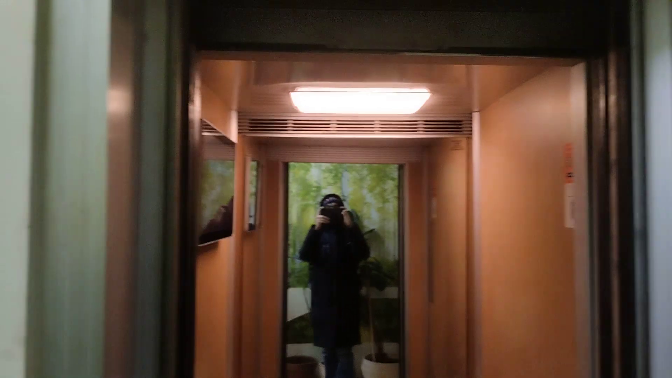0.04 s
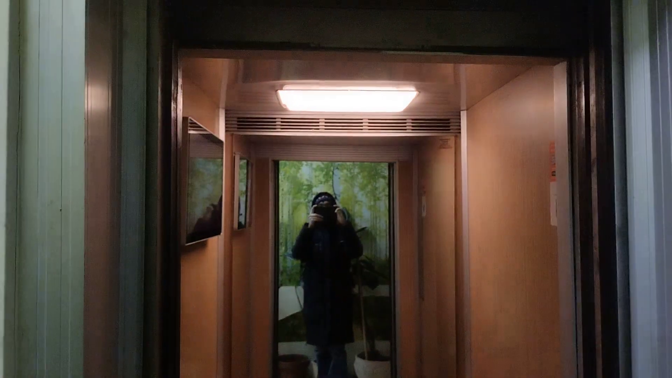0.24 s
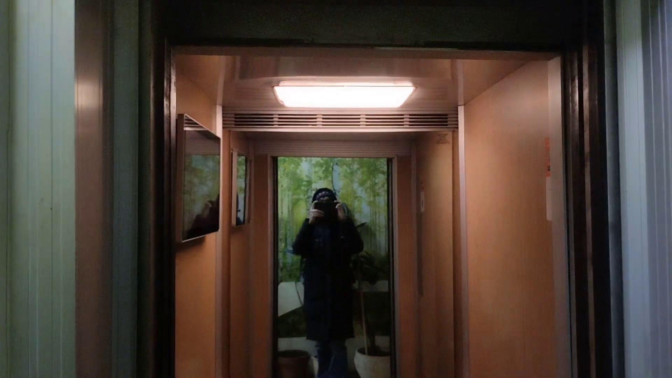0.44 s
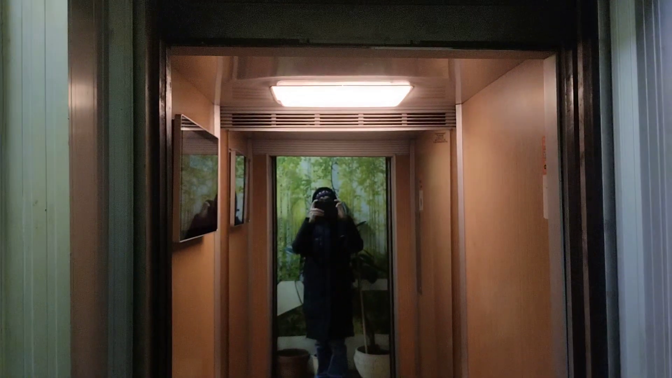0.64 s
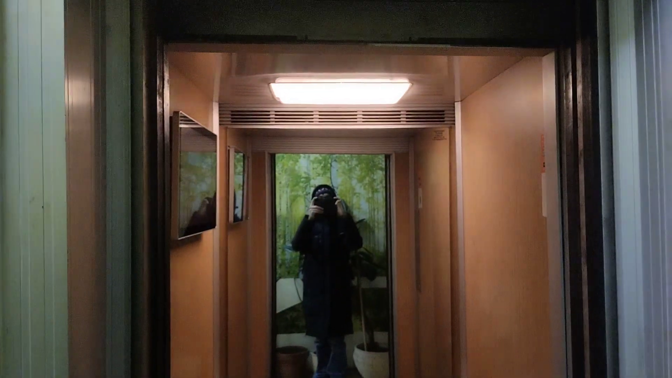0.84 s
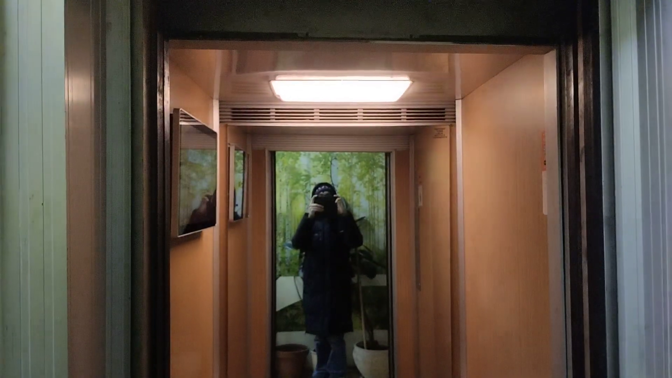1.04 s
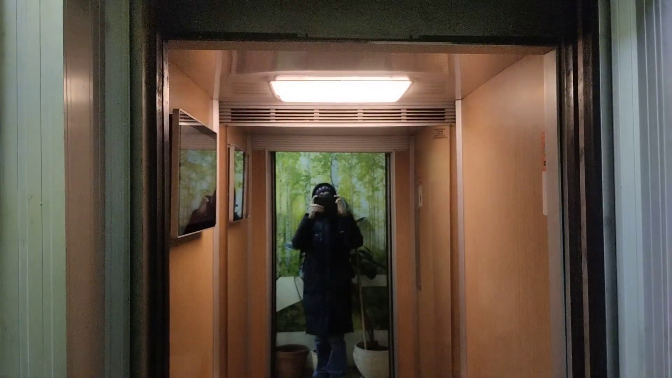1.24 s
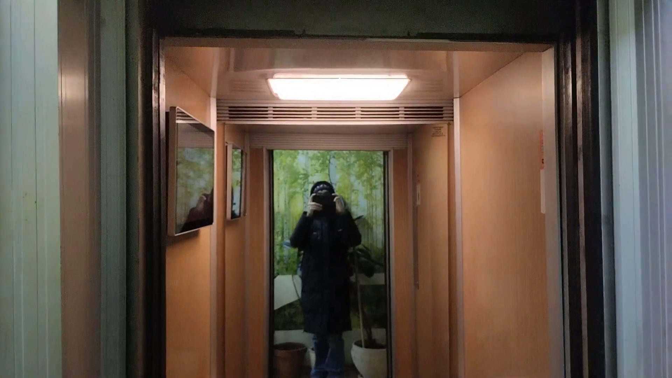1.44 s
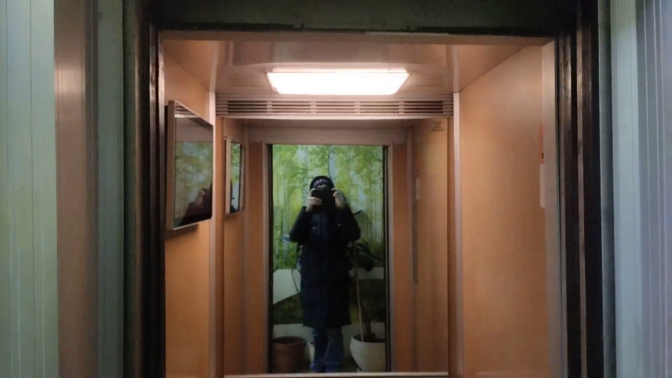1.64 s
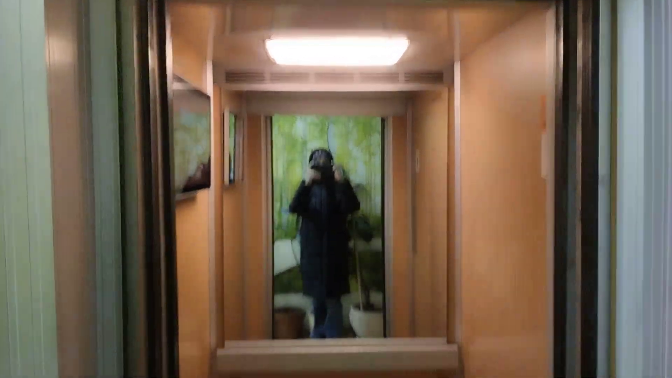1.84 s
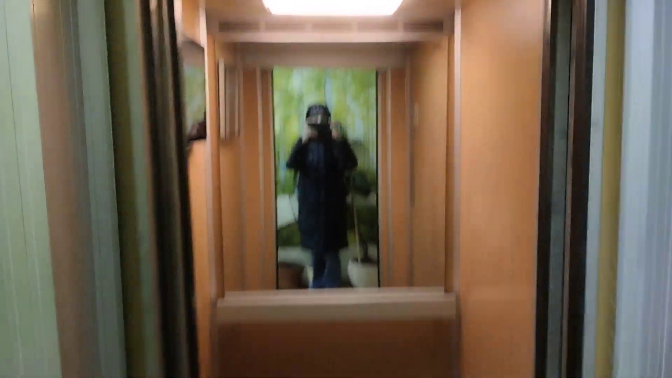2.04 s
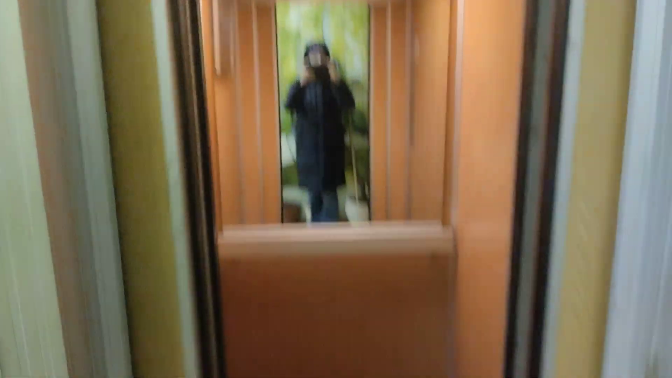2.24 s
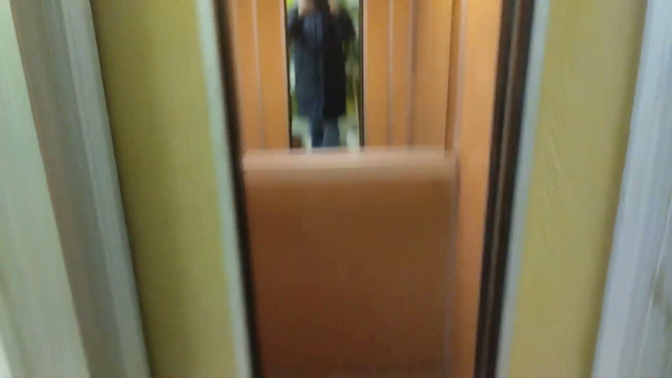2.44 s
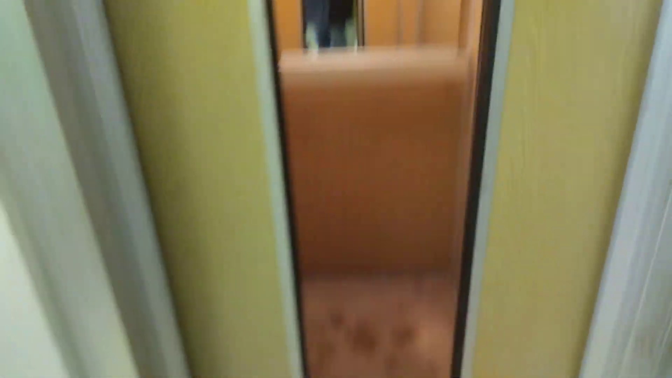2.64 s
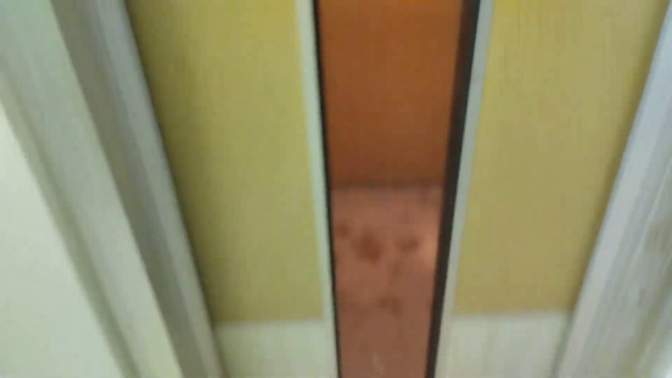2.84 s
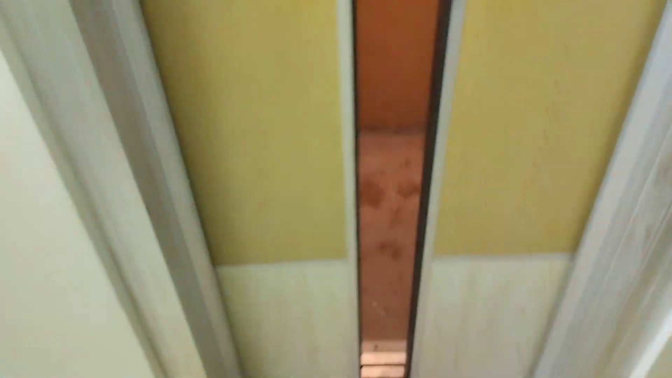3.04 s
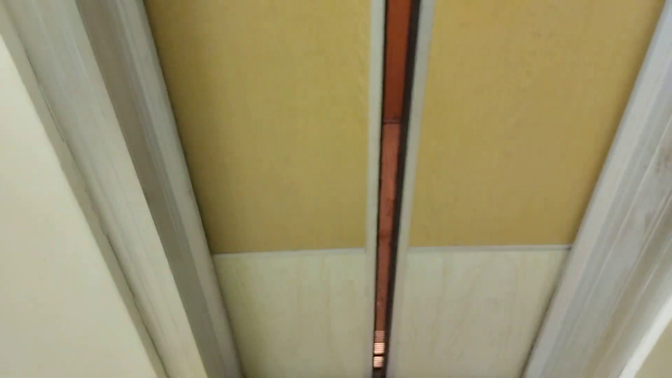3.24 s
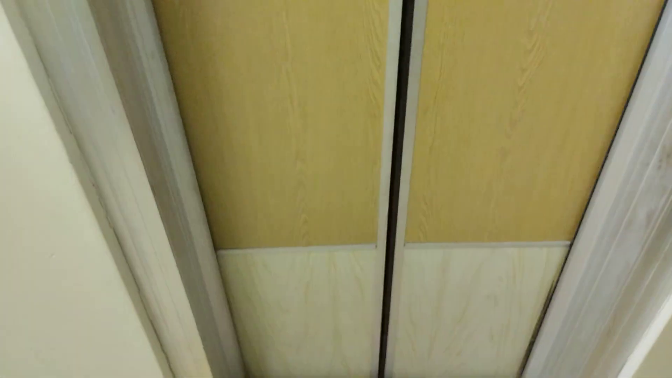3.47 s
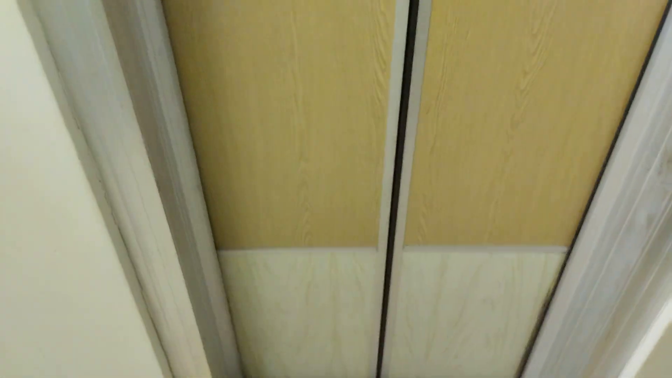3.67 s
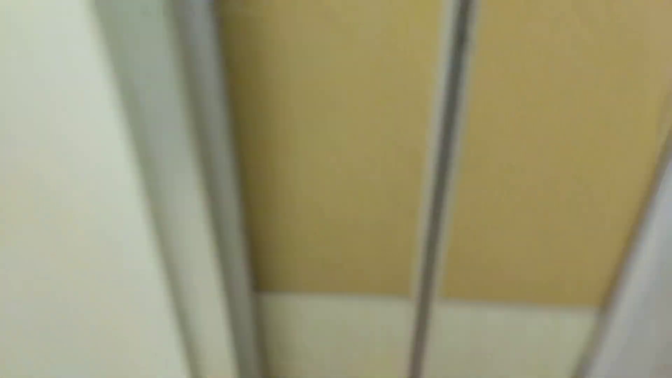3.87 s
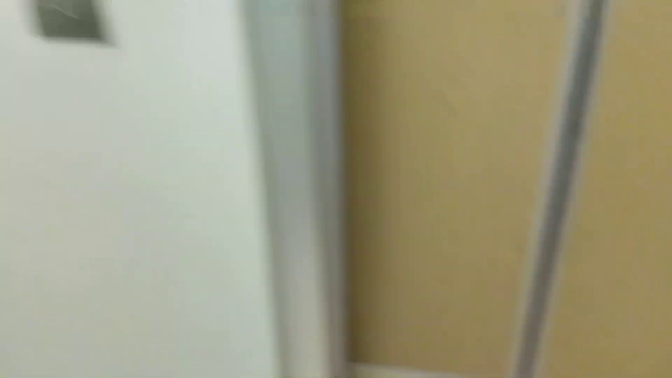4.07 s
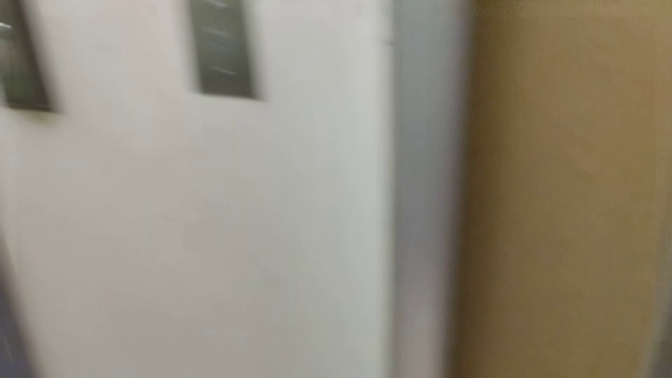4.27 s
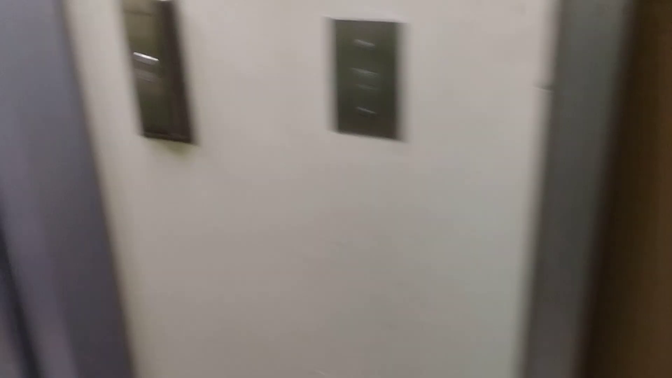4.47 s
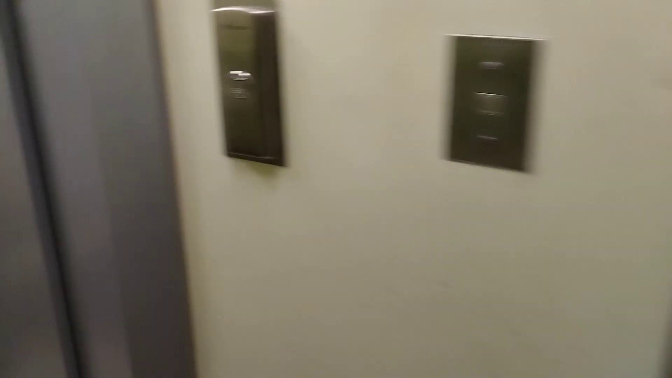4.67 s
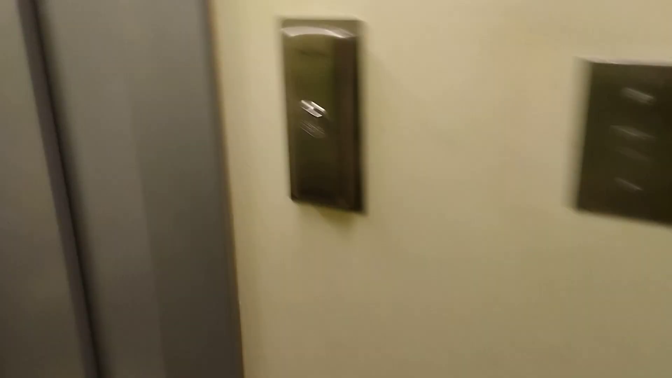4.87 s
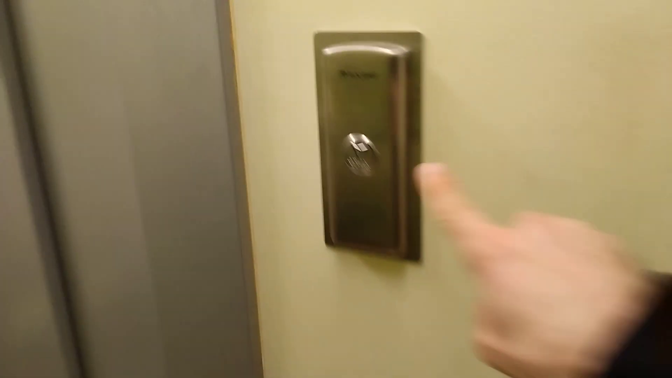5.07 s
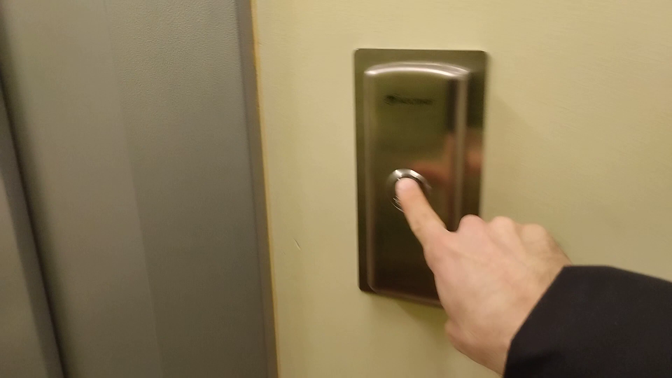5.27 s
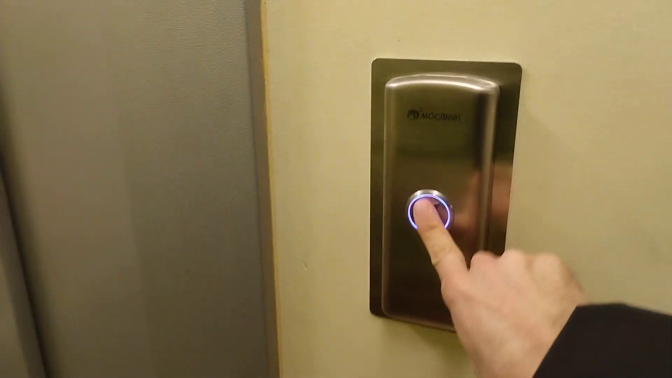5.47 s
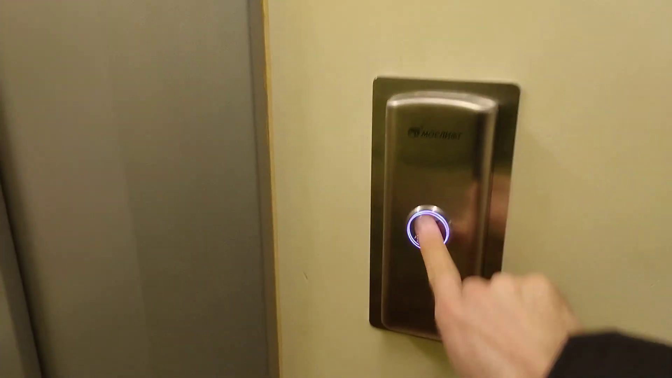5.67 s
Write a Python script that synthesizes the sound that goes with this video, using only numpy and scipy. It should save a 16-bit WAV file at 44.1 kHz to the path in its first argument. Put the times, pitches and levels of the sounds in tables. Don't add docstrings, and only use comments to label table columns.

```python
import sys
import numpy as np
from scipy import signal
from scipy.fft import rfft, irfft, next_fast_len
from scipy.io import wavfile
from scipy.ndimage import uniform_filter1d

SR = 44100
rng = np.random.default_rng(int(sys.argv[2]) if len(sys.argv) > 2 else 0)


def decibels_to_gain(level_db):
    exponent = np.asarray(level_db, float) / 20
    return 10 ** exponent


def transcribe(signal):
    frames = np.atleast_2d(signal).T
    limited = np.clip(frames, -1, 1)
    pcm = np.round(limited * 32767).astype(np.int16)
    wavfile.write(sys.argv[1], SR, pcm)


N = 251811


def unit(x):
    return x / np.sqrt(np.mean(x ** 2))


def peak(x, db):
    return x * decibels_to_gain(db) / np.abs(x).max()


def seconds(count):
    return np.arange(count) / SR


def noise(count):
    return rng.standard_normal(count)


def add(out, start_s, x):
    i = int(start_s * SR)
    out[i:i + len(x)] += x[:len(out) - i]


def colour(x, spectrum):
    hz, db = np.transpose(spectrum)
    size = next_fast_len(len(x))
    bins_hz = np.maximum(np.arange(size // 2 + 1) * SR / size, 1)
    gain = decibels_to_gain(np.interp(np.log(bins_hz), np.log(hz), db))
    return unit(irfft(rfft(x, size) * gain, size)[:len(x)])


def band(x, hz, width_hz):
    return signal.lfilter(*signal.iirpeak(min(hz, .45 * SR), hz / width_hz, fs=SR), x)


def two_bands(x, hz, width_hz, hz2, width2_hz):
    return band(band(x, hz, width_hz), hz2, width2_hz)


def dull(x, cutoff_hz):
    return signal.sosfilt(signal.butter(2, cutoff_hz, fs=SR, output="sos"), x)


def curves(table):
    s, *columns = np.transpose(table)
    t = seconds(N)
    runs_to_end = s[-1] > 5.6
    gate = np.clip(np.minimum(t - s[0] + .006, s[-1] - t + runs_to_end) / .006, 0, 1)
    return gate, [np.interp(t, s, column) for column in columns]


def walk(rate):
    hold = int(SR / rate)
    steps = np.repeat(noise(N // 50), hold)[:N]
    return 1.3 * uniform_filter1d(uniform_filter1d(steps, hold), hold)


def grit(spread_db, flicker_db, rate):
    size = np.minimum(rng.exponential(size=N), 5)
    return noise(N) * decibels_to_gain(spread_db * size + flicker_db * walk(rate))


def ring(push, modes):
    t = seconds(len(push))
    body = 0
    for hz, db, t60 in modes:
        body = body + decibels_to_gain(db) * np.sin(2 * np.pi * hz * t) * np.exp(-np.log(1000) / max(t60, .003) * t)
    return signal.fftconvolve(push, body)[:len(push)]


# pitch_hz, level_db [dB per Hz]
HUSH = [(150, -34), (250, -7.5), (407, -3.5), (1330, -13), (2860, -18), (5070, -21.5), (6360, -18.5),
        (10200, -20), (15200, -25.5), (16000, -26)]
# pitch_hz, level_db [dB per Hz]
SHAFT = [(18, -45), (30, -16), (72, 0), (88, -4), (103, -17.5), (193, -11), (223, -22.5), (300, -22),
         (390, -53), (660, -120)]
# time_s, level_db
SHAFT_LOAD = [
    (0, -61),
    (.97, -60.5),
    (1.03, -62.5),
    (1.35, -61),
    (4.55, -60),
    (4.7, -61.5),
    (5.71, -68),
]


def air():
    hush = colour(noise(N), HUSH)
    hum = colour(noise(N), SHAFT)
    drift = colour(noise(N), [(5, -39), (10, 4.5), (22, 0), (40, -28), (80, -67.5)])
    _, (hum_db,) = curves(SHAFT_LOAD)
    return decibels_to_gain(-71.5) * hush + decibels_to_gain(hum_db) * hum + decibels_to_gain(-62) * drift


# middle_s, level_db, width_s, direction (1 or -1)
JOLT = [
    (4.746, -34, .008, -1),
    (4.763, -30.5, .007, 1),
    (4.779, -42, .006, -1),
]


def jolt():
    t = seconds(N)
    return sum(way * decibels_to_gain(db) * np.exp(-((t - s) / width) ** 2) for s, db, width, way in JOLT)


# pitch_hz, level_db [dB per Hz]
SWISH = [(3240, -35), (5500, -15), (8150, 3.5), (9320, 2.5), (12500, -8), (15200, -7), (16000, -13.5)]
SCUFF = [(1060, -20.5), (1800, 0.5), (2000, -2), (2130, -0.5), (3260, -4.5), (6000, -8), (7800, -21),
         (13200, -120)]
RUB = [(88, -0.5), (150, -1.5), (287, -0.5), (557, -0.5), (1130, -5), (1460, -7), (2000, -23), (2600, -60),
       (4400, -120)]
# fastest_s, swish_db, scuff_db, low_rub_db, half_length_s
CLOTH = [
    (0.06, -71.5, -70, -75.5, 0.27),
    (4.14, -59, -63, -71, 0.13),
    (4.462, -63.5, -65, -65.5, 0.23),
    (4.665, -56.5, -66, -60, 0.11),
    (4.773, -57, -58.5, -58.5, 0.046),
    (4.916, -50.5, -59, -59.5, 0.087),
    (5.068, -47.5, -53.5, -50.5, 0.14),
    (5.379, -61.5, -69.5, -62, 0.1),
    (5.53, -65.5, -79, -78, 0.1),
    (5.71, -61.5, -66, -58, 0.11),
]


def cloth():
    fibres = grit(1.2, .7, 45)
    swish, scuff, rub = (colour(fibres, shape) for shape in (SWISH, SCUFF, RUB))
    out, t = np.zeros(N), seconds(N)
    for s, swish_db, scuff_db, rub_db, half in CLOTH:
        mix = decibels_to_gain(swish_db) * swish + decibels_to_gain(scuff_db) * scuff + decibels_to_gain(rub_db) * rub
        out += np.exp(-((t - s) / half) ** 2) * mix
    return out


# snap_s, peak_db, treble_db, body_hz, slide_db, slide_s
BUTTON = [
    (5.3114, -33, 3, 1260, -5.5, .007),
    (5.649, -32.5, -5.5, 1220, -10, .019),
]
# pitch_hz, level_db, t60_s
BUTTON_MODES = [
    [(410, -6, 0.042), (1180, -9, 0.024), (2030, -4, 0.0094), (2830, -3.5, 0.0076), (5170, -6.5, 0.0095),
     (7450, -3, 0.018), (9000, -4, .01)],
    [(700, -9, 0.007), (1310, -2, 0.029), (2040, -4.5, 0.0098), (2560, -3, .012), (3070, -8, 0.012),
     (8460, -10, .008), (9450, -8, .008)],
]


def button():
    out, t = np.zeros(N), seconds(SR // 4)
    for (s, db, treble_db, body_hz, slide_db, slide_s), modes in zip(BUTTON, BUTTON_MODES):
        chatter = np.exp(-(t / .005) ** 4) * np.minimum(.3 + t / .003, 1) + .2 * np.exp(-t / .008)
        snap = noise(len(t)) * chatter
        slide = two_bands(noise(len(t)), body_hz, 560, body_hz, 820)
        slide = slide * np.minimum(t / .003, 1) * np.exp(-(t / slide_s) ** 6)
        add(out, s - slide_s, peak(slide, db + slide_db))
        treble = two_bands(snap, 9200, 7000, 9600, 6100)
        add(out, s, peak(ring(snap, modes), db + 3.5) + peak(treble, db + treble_db))
    return signal.sosfilt(signal.butter(2, (230, 13000), "band", fs=SR, output="sos"), out)


# start_s, peak_db, pitch_hz, length_s
FLECKS = [(1.2386, -62, 12000, .001), (1.3363, -54, 9300, .006), (1.393, -46, 10200, .004),
          (1.407, -50, 12500, .003), (1.43, -54, 11000, .002), (1.446, -51, 9500, .002),
          (1.462, -50, 9300, .002), (1.47, -56, 11000, .002), (1.49, -59, 11500, .002),
          (1.5124, -59, 10500, .002), (1.6681, -50, 9300, .006), (1.6805, -48, 10000, .004),
          (1.69, -42, 10500, .008), (1.724, -39, 10000, .003), (3.356, -32, 13500, .01),
          (3.353, -21, 5500, .001), (2.637, -36, 9000, .001), (3.078, -48, 11500, .01),
          (4.519, -42, 13600, .0005), (4.552, -34.5, 8700, .0008)]


def flecks():
    out, t = np.zeros(N), seconds(SR // 20)
    for s, db, hz, length in FLECKS:
        grain = noise(len(t)) * np.exp(-t / length)
        add(out, s, peak(two_bands(grain, hz, 2500, hz, 4000), db))
    return out


# start_s, peak_db
CRACKS = [
    (1.8482, -28),
    (3.3539, -14),
    (4.519, -42),
]


def cracks():
    out, t = np.zeros(N), seconds(SR // 50)
    for s, db in CRACKS:
        snap = noise(len(t)) * np.exp(-t / .0004)
        add(out, s, peak(two_bands(snap, 8000, 10000, 8000, 4500), db))
    return out


# start_s, peak_db, ring_hz, t60_s
TICKS = [(1.2386, -63, 8450, .072), (1.6876, -35.5, 9000, .087), (1.759, -38, 6100, .073),
         (1.848, -38, 8150, 0.2), (1.949, -50, 6050, .029), (1.975, -34, 6300, .06),
         (2.1988, -35.5, 7860, 0.16), (2.2614, -37.5, 8850, 0.2), (2.297, -39.5, 8100, .074),
         (2.3545, -40, 9100, .04), (2.636, -32.5, 8300, 0.03), (2.9337, -41, 6100, 0.089),
         (3.0923, -29, 8350, 0.086), (3.1446, -36, 8500, 0.078), (3.354, -18.5, 9000, 0.062),
         (3.527, -22, 7700, 0.083), (3.8, -39, 8130, .02), (3.8073, -37, 7900, 0.027),
         (3.825, -38.5, 5500, .02), (2.55, -29.5, 8000, 0.055), (4.462, -52, 8650, 0.068),
         (4.552, -49, 8550, 0.03)]


def ticks():
    out, t = np.zeros(N), seconds(SR // 6)
    for s, db, ring_hz, t60 in TICKS:
        edge = noise(len(t)) * np.exp(-t / .0006)
        edge = two_bands(edge, 8300, 9000, 8300, 9000)
        tail = noise(len(t)) * 1000 ** (-t / np.clip(t60, .005, .3)) * np.minimum(t / .0021, 1)
        thin = band(tail, ring_hz, 600)
        wide = two_bands(tail, 6100, 6000, 8600, 7000)
        add(out, s, peak(edge, db - 3.5) + peak(thin, db - 3) + peak(wide, db - 5.5))
    return out


# time_s, pitch_hz, level_db
SQUEAK = [
    (3.025, 7250, -43),
    (3.05, 6970, -35),
    (3.075, 7030, -43),
    (3.1, 7070, -50),
]


def squeak():
    gate, (hz, db) = curves(SQUEAK)
    phase = 2 * np.pi * np.cumsum(hz * (1 + .0154 * walk(700))) / SR
    rough = unit(two_bands(noise(N), 9100, 900, 7840, 1300))
    tone = np.sin(phase) + decibels_to_gain(-24) * np.sin(2 * phase) + decibels_to_gain(-14) * rough
    return gate * decibels_to_gain(db - 3 + 3.5 * walk(300)) * tone


# start_s, end_s, level_db, from_hz, to_hz
CHIRPS = [
    (1.722, 1.785, -43.5, 1400, 1600),
    (3.028, 3.055, -59, 13600, 13900),
    (3.042, 3.062, -63, 14500, 15100),
    (3.045, 3.085, -50.5, 8100, 8700),
    (3.03, 3.06, -53, 7600, 8100),
    (3.098, 3.115, -60, 11900, 12000),
    (3.06, 3.09, -67, 14000, 14000),
]


def chirps():
    out = np.zeros(N)
    for start, end, db, from_hz, to_hz in CHIRPS:
        t = np.linspace(0, 1, int((end - start) * SR))
        wander = uniform_filter1d(noise(SR // 5), size=40)
        grip = decibels_to_gain(5 * unit(wander[::-1][:len(t)]))
        hz = (from_hz + (to_hz - from_hz) * t) * (1 + .33 * wander[:len(t)])
        swell = np.sqrt(2 * np.sin(np.pi * t))
        add(out, start, decibels_to_gain(db) * grip * swell * np.sin(2 * np.pi * np.cumsum(hz) / SR))
    return out


# start_s, end_s, level_db, pitch_hz, width_hz
RUBBING = [(1.343, 1.9, -62.5, 3360, 140), (1.345, 1.6, -63, 2230, 160), (1.5, 1.59, -57.5, 1590, 140),
           (1.6, 1.651, -59, 1570, 120), (1.505, 1.579, -58.5, 1860, 130), (1.737, 1.899, -52, 1836, 110),
           (3.097, 3.182, -50.5, 2530, 95), (3.093, 3.19, -61, 3500, 90), (3.095, 3.19, -54, 5500, 90),
           (3.1, 3.19, -61, 8300, 80), (3.075, 3.096, -56, 12000, 1500), (3.14, 3.17, -51, 9100, 1200),
           (3.34, 3.355, -44, 6700, 4000), (3.403, 3.42, -31, 6800, 900), (3.418, 3.45, -34.5, 8000, 2000),
           (3.41, 3.459, -33, 2660, 230), (3.511, 3.535, -28.5, 8800, 1400),
           (3.519, 3.536, -28, 5200, 2100), (3.55, 3.72, -59, 4030, 110), (3.53, 3.665, -43, 2200, 140),
           (3.7, 3.76, -49.5, 9000, 830), (5.657, 5.71, -59, 1560, 500)]


def rubbing():
    out = np.zeros(N)
    for start, end, db, hz, width_hz in RUBBING:
        t = seconds(int((end - start) * SR))
        touch = np.clip(np.minimum(t / .0074, (t[-1] - t) / .0098), 0, 1)
        song = two_bands(noise(SR * 2 // 3), hz, width_hz, hz, 2 * width_hz)
        steady = unit(song / np.sqrt(uniform_filter1d(song ** 2, size=SR // 30)))
        add(out, start, decibels_to_gain(db) * touch * steady[-len(t):])
    return out


# start_s, peak_db, pitch_hz
BUMPS = [(1.401, -38.5, 190), (1.457, -41.5, 110), (1.49, -41, 150), (1.567, -38.5, 140), (1.659, -33, 120),
         (2.001, -36, 216), (2.347, -32, 221), (2.396, -32, 223), (2.427, -35, 228), (2.495, -36.5, 249),
         (2.5, -35, 520), (2.59, -35.5, 540), (2.519, -30.5, 216), (2.56, -33, 232), (2.62, -30.5, 189),
         (2.72, -33, 115), (2.786, -33.5, 199), (3.046, -33, 199), (3.096, -40, 218), (3.127, -40, 248),
         (3.203, -35.5, 256), (3.24, -40, 272), (3.277, -37, 235), (3.438, -23.5, 208.5)]
# start_s, peak_db, pitch_hz, t60_s
CLINKS = [(2.972, -39, 715, .08), (2.973, -37, 1500, 0.073), (3.093, -40, 4275, 0.065),
          (3.097, -45, 3210, .08), (3.182, -42, 5700, 0.073), (3.185, -35, 2700, 0.055),
          (3.19, -36, 950, 0.055), (3.524, -28, 3440, 0.077), (3.597, -43, 4000, .05),
          (3.617, -41, 4050, .04), (3.649, -37.5, 3990, 0.066), (3.69, -49, 4000, .04),
          (3.711, -50, 4020, .04), (3.722, -49, 3440, .04), (3.517, -18.5, 2000, .05),
          (3.525, -24, 1880, .05), (3.545, -27, 2250, .06), (1.85, -48, 8100, .4), (1.975, -42, 6100, .08),
          (2.472, -33, 2270, 0.087), (1.726, -37.5, 1350, 0.069), (3.803, -30, 1877, 0.036),
          (3.82, -32.5, 1870, .04), (3.843, -41, 2100, 0.045), (1.661, -50, 890, .03), (2.64, -41, 787, .1),
          (2.82, -43, 982, 0.17)]


def clinks():
    out, t = np.zeros(N), seconds(SR // 8)
    bumps = [(*row, .073, .0036) for row in BUMPS]
    for s, db, hz, t60, rise in bumps + [(*row, .0016) for row in CLINKS]:
        swell = 1 - np.exp(-(t / rise) ** 2)
        fade = 1000 ** (-t / t60) * (1 - t / t[-1])
        add(out, s, peak(np.sin(2 * np.pi * hz * t) * swell * fade, db))
    return out


# start_s, peak_db, pitch_hz,
# width_hz, t60_s
LOOSE_PARTS = [(1.391, -41.5, 570, 84, 0.19), (1.727, -27, 948, 100, 0.11), (2.466, -39, 1630, 120, 0.27),
               (2.468, -33, 2840, 110, 1.25), (2.488, -26.5, 385, 30, 0.2), (2.549, -32, 4000, 300, 0.36),
               (2.56, -28, 730, 79, 0.17), (2.972, -37.5, 970, 152, 0.063), (2.343, -35, 2230, 100, .12),
               (2.345, -32, 240, 35, 0.44), (2.56, -30, 240, 32, 0.38), (1.44, -35, 110, 15, 1.4),
               (3.19, -34.5, 170, 40, 0.43), (2.55, -25.5, 2200, 120, 0.1), (2.972, -36, 1480, 200, 0.24),
               (3.094, -34, 4270, 90, 0.083), (3.183, -26, 996, 220, 0.093), (3.19, -32.5, 541, 66, 0.53),
               (3.5, -25.5, 2400, 440, 0.13),
               (3.416, -16, 201.5, 23, 0.5), (3.56, -30, 103, 13, 2.9), (3.501, -34, 156, 6.1, 3.9),
           (3.517, -19.5, 1875, 132, 0.26), (3.525, -23.5, 2236, 74, 0.32), (3.522, -31, 3445, 90, 0.57),
           (3.521, -29, 4000, 95, 0.45), (3.522, -29.5, 4510, 90, 0.45), (3.661, -38, 4800, 100, .11),
           (3.801, -42, 1700, 100, 0.3), (3.835, -41, 2300, 190, .1), (4.618, -48.5, 370, 23, 0.6),
           (3.52, -29, 2040, 47, 0.48), (3.52, -32.5, 2900, 140, 0.88)]
# start_s, peak_db, pitch_hz, width_hz, t60_s
PLATE = [
    (5.315, -57, 4705, 110, 0.4),
    (5.316, -54, 1104, 90, .25),
    (5.316, -43.5, 285, 38, 0.29),
    (5.653, -56, 1060, 30, .3),
    (5.653, -49.5, 277, 22, 0.33),
    (4.066, -39, 500, 800, 0.021),
    (5.272, -50, 900, 900, .02),
]


def rings():
    out, t = np.zeros(N), seconds(SR * 2 // 3)
    for s, db, hz, width_hz, t60 in LOOSE_PARTS + PLATE:
        wander, tremble = rng.standard_normal((2, len(t)))
        phase = 2 * np.pi * hz * t + np.cumsum(wander) * np.sqrt(2 * np.pi * width_hz / SR)
        memory = np.exp(-2 * np.pi * (.5 * width_hz + 15) / SR)
        tremble = unit(signal.lfilter([1], [1, -memory], tremble))
        fade = np.minimum(t / .00081, 1) * 1000 ** (-t / t60) * (1 - t / t[-1])
        add(out, s, decibels_to_gain(db - 4.5 + 3.35 * tremble) * band(np.sin(phase), hz, 2 * width_hz) * fade)
    return out


# pitch_hz, width_hz, level_db
BOOM = [(72.3, 13, -4.5), (102, 16, 2.5), (127.2, 12, -0.5), (154, 11, -5.5), (195.6, 14, 2),
        (229.7, 7.2, -3.5), (285, 20, -16), (326, 21, -27), (377, 80, -20)]
# pitch_hz, level_db, t60_s
PANEL = [(532, -4, 1), (834, 1.5, 0.11), (1007, -7.5, .2), (1500, -13.5, 0.68), (1632, -11.5, 0.96),
         (1895, -1.5, 0.11), (1850, -3, 0.055), (2184, -0.5, 0.13), (2384, -3, 0.24), (2880, -14, 0.33),
         (3445, -22.5, 0.53), (4000, -10, 0.14), (4590, -7, 0.4), (5500, -3, 0.4)]
# pitch_hz, level_db [dB per Hz]
GRIND = [(180, -21), (300, -16), (385, 5.5), (417, -7), (535, 6), (861, 0), (1010, 6.5), (1130, 3.5),
         (2230, 4.5), (3170, -8), (4500, -11.5), (5850, -41), (9900, -120)]
HISS = [(1760, -27.5), (3000, 4), (3170, 2.5), (3940, -0.5), (4700, 2), (6040, 4), (7200, 1), (8340, 7),
        (15100, -24), (16000, -32)]
# time_s, load_db
TRAVEL = [(1.335, -60), (1.41, -49), (1.62, -61.5), (1.68, -55), (1.76, -45.5), (1.9, -54.5), (2.0, -42),
          (2.11, -46), (2.25, -48.5), (2.45, -46.5), (2.48, -39), (2.6, -41), (2.8, -48.5), (3.05, -51.5),
          (3.17, -46), (3.19, -42.5), (3.3, -51.5), (3.351, -60)]
# time_s, load_db
SETTLE = [
    (3.351, -41),
    (3.395, -37),
    (3.42, -30),
    (3.48, -34),
    (3.54, -31),
    (3.66, -44),
    (3.8, -50),
    (4.02, -62),
    (4.4, -73),
]
# level_db at -45 dB load, slope [dB per dB of load]
TRAVEL_LAW = [(-47.5, 1), (-45, 1.06), (-50, 1.01)]
SETTLE_LAW = [(-46, 0.86), (-43, 1.06), (-50.5, 1)]
# start_s, sway_db, boom_db
LURCHES = [(1.37, -42.5, -46), (1.659, -39, -40), (1.95, -44, -45), (2.24, -35.5, -46.5),
           (2.35, -50, -46.5), (2.46, -31.5, -44), (2.65, -38.5, -45.5), (2.88, -40.5, -47),
           (3.08, -50, -40.5), (3.185, -50, -41.5), (3.32, -43, -52), (3.62, -40.5, -46.5),
           (3.74, -48, -63), (3.88, -51.5, -69)]
# strongest_s, half_length_s, level_db
DUST = (2.78, 0.28, -67)


def rolling():
    sway_hz = 27.6 * (1 + .021 * walk(3.9))
    sway = np.sqrt(2) * np.sin(2 * np.pi * np.cumsum(sway_hz) / SR)
    shake = grit(1, .85, 20)
    boom = unit(sum(decibels_to_gain(db) * unit(band(shake, hz, 1.46 * width)) for hz, width, db in BOOM))
    boom = unit(boom / np.sqrt(uniform_filter1d(boom ** 2, size=SR // 8)))
    contacts = colour(grit(2, 1.5, 45), GRIND)
    panel = unit(sum(decibels_to_gain(db) * band(contacts, hz, 33) for hz, db, _ in PANEL))
    grind = unit(contacts + decibels_to_gain(-20.5) * panel)
    fizz = unit(two_bands(shake, 13000, 5500, 13600, 5000))
    hiss = colour(grit(1.5, 1, 40), HISS) + decibels_to_gain(-23) * fizz

    strongest_s, half_s, dust_db = DUST
    out = decibels_to_gain(dust_db) * np.exp(-((seconds(N) - strongest_s) / half_s) ** 2) * fizz
    t = seconds(SR)
    swing = 2 * (1 - np.exp(-t / .068)) * np.exp(-t / .13)
    for s, sway_db, boom_db in LURCHES:
        here = slice(int(s * SR), int(s * SR) + SR)
        add(out, s, swing * (decibels_to_gain(sway_db) * sway[here] + decibels_to_gain(boom_db) * boom[here]))
    for table, law in ((TRAVEL, TRAVEL_LAW), (SETTLE, SETTLE_LAW)):
        gate, (load_db,) = curves(table)
        for (db, slope), layer in zip(law, (boom, grind, hiss)):
            out = out + gate * decibels_to_gain(db + slope * (load_db + 45)) * layer
    return out


# start_s, peak_db, treble_db, ring_hz (loudest)
HANGERS = [(1.335, -48, 1, 760), (1.403, -42.5, 2.5, 610), (1.661, -37, -13, 1410), (1.697, -33, -6.5, 595),
           (1.726, -30.5, -5.5, 930), (1.752, -34, -9, 1620), (1.876, -33.5, -20, 1760),
           (1.956, -30.5, -6, 1160), (1.995, -36, -6, 1210), (2.023, -29, -9, 1869),
           (2.129, -31.5, -7.5, 1150), (2.296, -40, -8, 1500), (2.343, -27, -9.5, 2160),
           (2.466, -21.5, -18, 2340), (2.548, -20, -46, 1820), (2.579, -27, -40, 774),
           (2.811, -38, -5, 980), (2.971, -33, -9, 1440), (3.007, -37, -9, 1420), (3.094, -25.5, -4, 1500),
           (3.183, -35, -25, 2300)]
# start_s, peak_db, treble_db, ring_hz (loudest), thud_db
LATCH = [
    (3.353, -28.5, 7.5, 600, 7),
    (3.403, -20, -5, 2660, -15),
    (3.424, -13, -25.5, 996, -18),
    (3.474, -14.5, -27, 1590, -13),
    (3.517, -14.5, -38, 1930, -12),
    (3.55, -26.5, -30, 2200, 10.5),
    (3.658, -35, -27, 2880, 4),
    (3.803, -34, -21, 1830, -3),
    (3.824, -30.5, -21, 1920, 5),
    (4.065, -66, 5, 624, -12),
]


def knocks():
    out, t = np.zeros(N), seconds(SR * 2 // 5)
    blows = [(*row, -24, .02) for row in HANGERS] + [(*row, .017) for row in LATCH]
    for s, db, treble_db, ring_hz, thud_db, length in blows:
        contact, detune, uneven = rng.standard_normal((3, len(t)))
        crunch = contact * np.exp(-t / length) * np.minimum(t / .0038, 1)
        modes = [(ring_hz, 0, .05)]
        for (hz, mode_db, t60), a, b in zip(PANEL, detune, uneven):
            struck_db = mode_db + 3 * b - 9 * np.log2(hz / ring_hz) ** 2
            modes.append((hz * (1 + .0044 * a), struck_db, .45 * t60))
        body = two_bands(crunch, ring_hz, 2.2 * ring_hz, 1660, 4000)
        metal = peak(ring(crunch, modes), -4) + peak(body, 1)
        splash = two_bands(crunch, 5000, 6400, 8500, 3300)
        thud = ring(crunch, [(hz, boom_db, .12) for hz, _, boom_db in BOOM[2:]])
        add(out, s, peak(metal, db - 5) + peak(splash, db + treble_db) + peak(thud, db + thud_db - 12))
    return out


# pitch_hz, t60_s
LOBBY_T60 = [(150, 0.42), (1000, 0.81), (4000, 0.38), (12000, 0.34)]


def lobby(x):
    t, tail = seconds(SR), np.zeros(SR)
    hz, t60 = np.transpose(LOBBY_T60)
    for centre_hz in 90 * 2 ** np.arange(8):
        fade_s = np.interp(np.log(centre_hz), np.log(hz), t60)
        tail += band(noise(SR), centre_hz, 1.66 * centre_hz) * 1000 ** (-t / fade_s)
    tail *= np.minimum(t / .0095, 1)
    return signal.fftconvolve(x, tail / np.sqrt(np.sum(tail ** 2)))[:N]


def scene():
    blows = dull(knocks() + ticks() + squeak(), 11500) + cracks()
    buzz = dull(rings() + rubbing(), 12000) + chirps() + clinks()
    near = button()
    room = decibels_to_gain(-6) * lobby(blows + decibels_to_gain(-4.5) * buzz + decibels_to_gain(-1.5) * near)
    doors = rolling() + blows + buzz
    hand = near + cloth() + jolt()
    return (doors + room + hand + air() + flecks())[None]


def roll_off(x):
    return signal.sosfilt(signal.butter(12, 15900, fs=SR, output="sos"), x)


def record(dry):
    return roll_off(dry)


dry = scene()
out = record(dry)
transcribe(out)
```